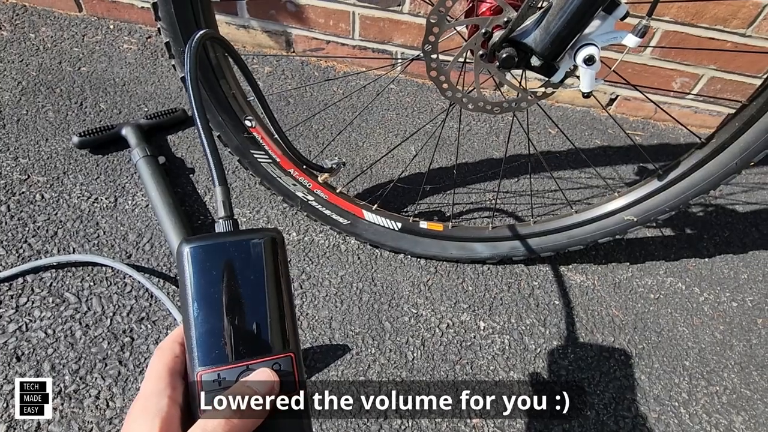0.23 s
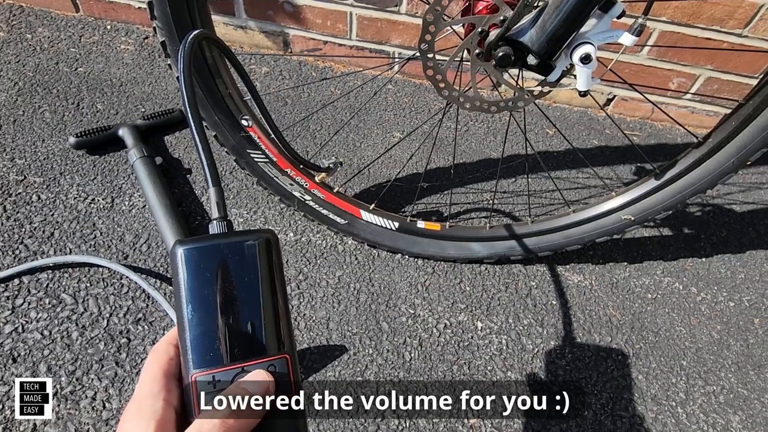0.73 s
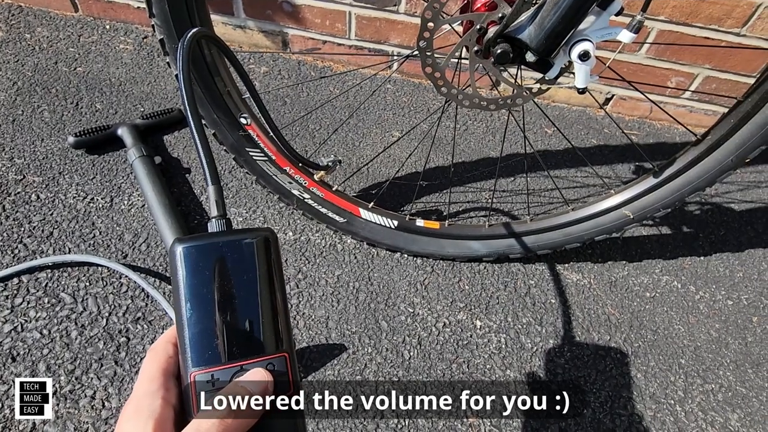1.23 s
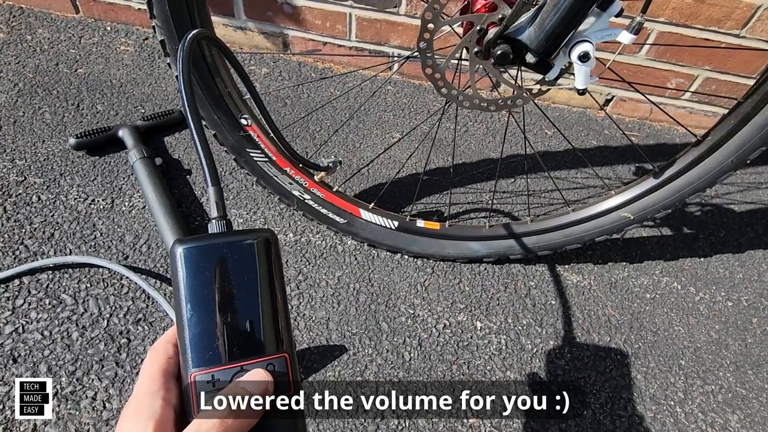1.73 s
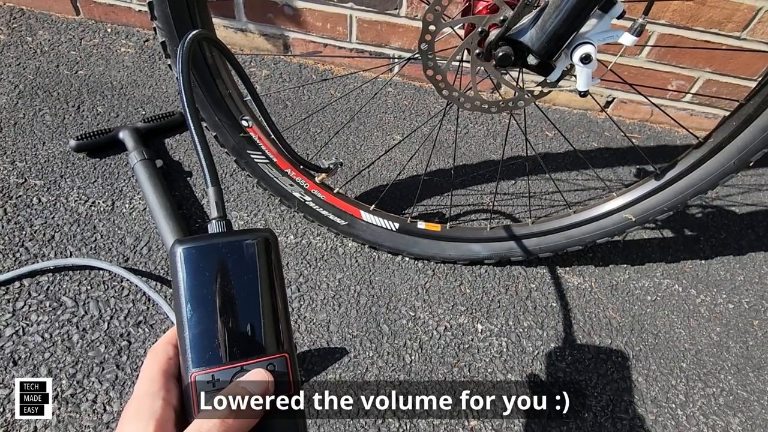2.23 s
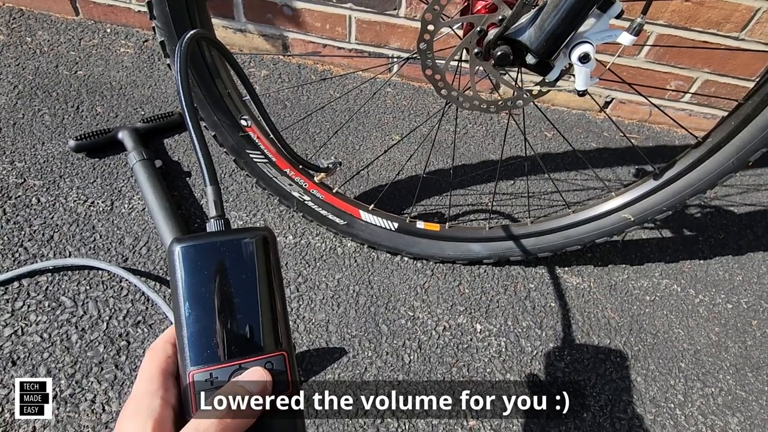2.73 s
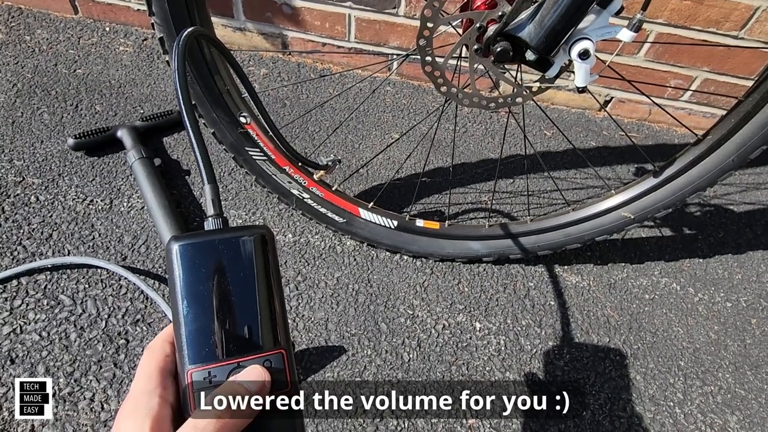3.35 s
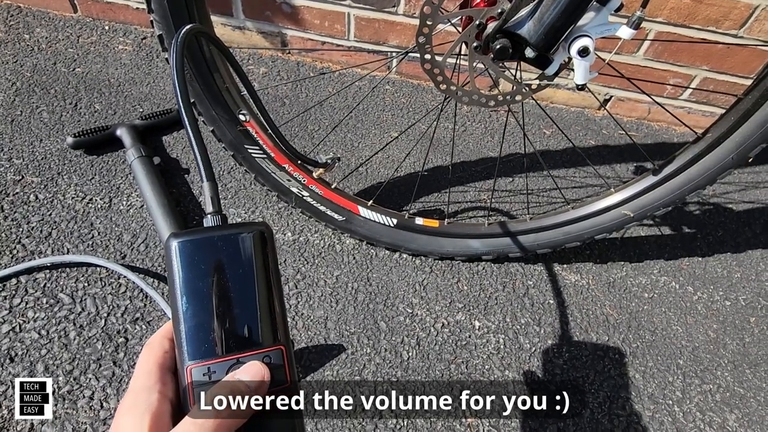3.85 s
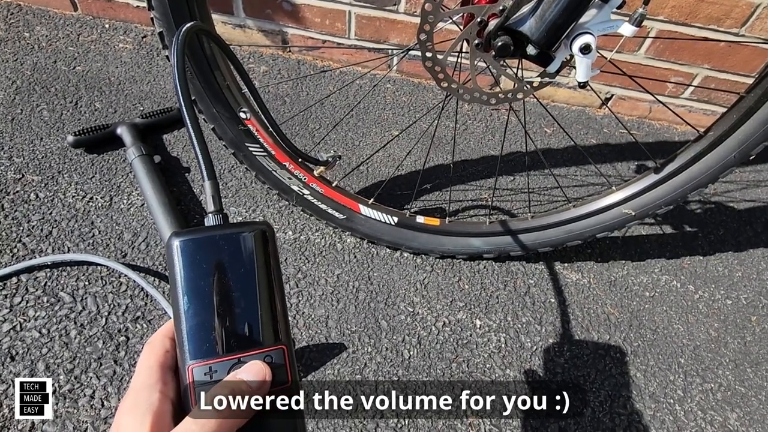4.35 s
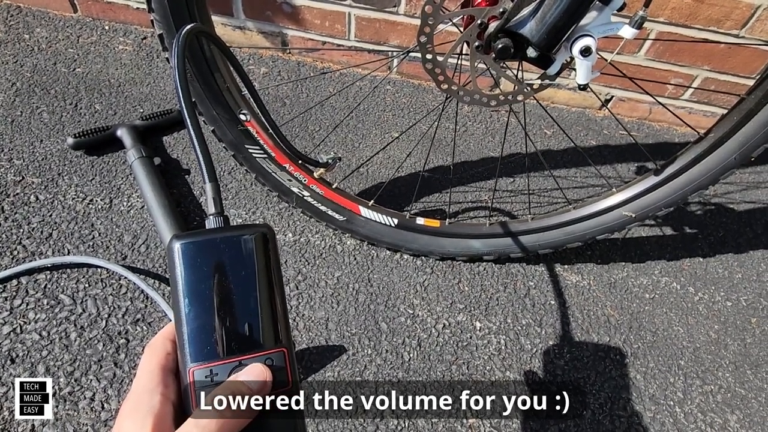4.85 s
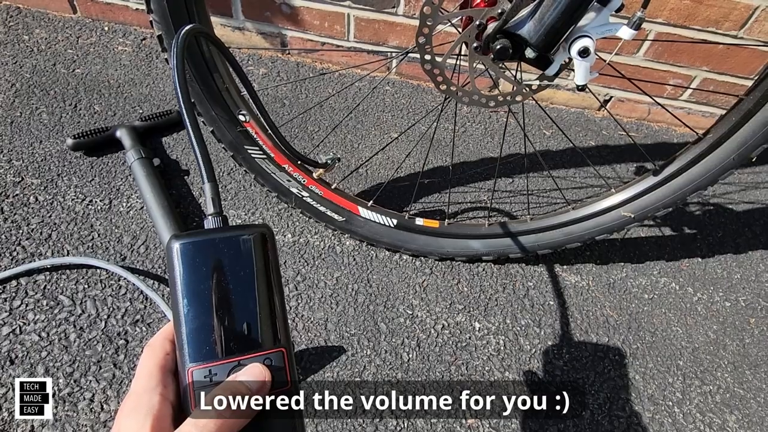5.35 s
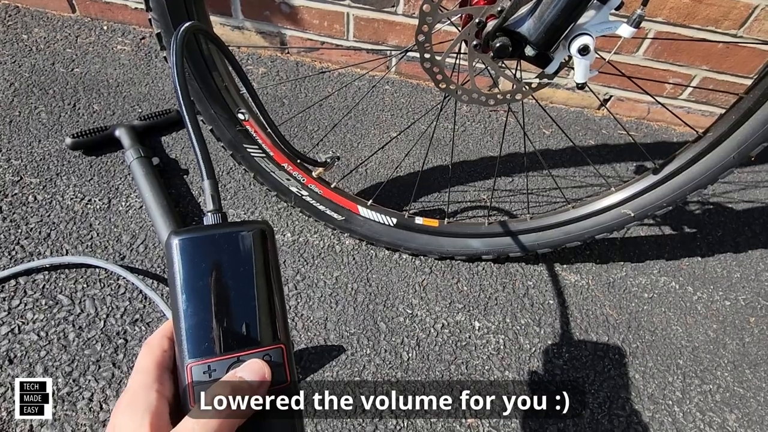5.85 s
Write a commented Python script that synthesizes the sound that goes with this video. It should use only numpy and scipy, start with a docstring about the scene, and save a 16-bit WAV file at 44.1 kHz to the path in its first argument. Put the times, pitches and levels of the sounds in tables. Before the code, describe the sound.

A small hand-held air compressor drones loudly and steadily up close, buzzing, whining and hissing while light wind puffs rumble low.

```python
"""A buzzing piston drone, with a knocking whine, valve clatter and hiss: a hand-held battery compressor
pumps up a bicycle tire outdoors, close to a pair of microphone ports.
Its motor drives a 37-tooth crank gear through an 8-tooth pinion. Drone and upper tones are summed tones
locked to the crank, mostly its harmonics; clatter, grind and hiss are coloured noise shaped by the blows.
The crank slows a little as the tire firms, and a light breeze buffets the ports as gusty low noise."""
import sys
import numpy as np
from scipy.fft import rfft, irfft, next_fast_len
from scipy.io import wavfile
from scipy.ndimage import map_coordinates

SR = 44100
rng = np.random.default_rng(int(sys.argv[2]) if len(sys.argv) > 2 else 0)


def file_out(sig):
    """Save sig as 16-bit WAV at sys.argv[1]."""
    # one column per channel
    cols = np.atleast_2d(sig).T
    # limit, then scale
    lim = np.clip(cols, -1, 1)
    pcm = np.round(lim * 32767).astype(np.int16)
    wavfile.write(sys.argv[1], SR, pcm)


N = 268569
TIME = np.arange(N) / SR
PRESSURE = TIME / TIME[-1]  # 0 = soft tire, 1 = firmer tire

GEAR_TEETH, PINION_TEETH = 37, 8
CRANK_HZ, SAG_HZ_PER_S = 59.825, .3205  # crank speed at the start, and how fast it drops
START_TURNS = -0.03018  # crank angle at the start
KNOCK_PLACE = .46  # turns at which the piston reverses with a knock
BLOW_SCATTER_DB = 1.8  # unevenness from blow to blow in clatter and hiss

SWAY_HZ, SWAY_WIDTH_HZ = 140, 102  # the whole case swaying in the hand
RING_HZ, RING_WIDTH_HZ = 578, 110  # a wall of the case, which rings on after each blow

LEFT_LEAD = 0.0003127  # s by which the noise layers reach the left port first
PORTS_ALIKE = .55  # share of rubbing-noise power common to both ports
CALM_DB = -45  # light air between gusts, before the breeze level
TOP_HZ = 15750  # band limit


def amp(db):
    """Decibels to gain."""
    return 10 ** (np.asarray(db) / 20)


def unit(x):
    """x at rms 1."""
    return x / np.sqrt(np.mean(x ** 2) + 1e-20)


def wobble(rate):
    """A smooth random curve, rate knots a second."""
    knots = rng.standard_normal(int(N * rate / SR) + 4)
    return map_coordinates(knots, [TIME * rate])


def filtered(x, response):
    """x times a complex response of frequency."""
    m = next_fast_len(N + SR // 4)
    hz = np.fft.rfftfreq(m, 1 / SR)
    return irfft(rfft(x, m) * response(hz), m)[..., :N]


def along(knots, values, hz):
    """Values joined on a log-frequency axis."""
    return np.interp(np.log(hz + 1), np.log(knots), values)


def pair(three, alike):
    """Two channels that share the first of three signals."""
    alike = np.clip(alike, 0, 1)
    return np.sqrt(alike) * three[0] + np.sqrt(1 - alike) * three[1:]


def radiate(x, spectrum):
    """White excitation takes the colour heard at each port, which shifts with the pressure."""
    knots, left, right, gained = np.transpose(spectrum)

    def colour(hz, share):
        low_edge = 1 + (knots[0] / (hz + 1)) ** 50
        high_edge = 1 + (hz / knots[-1]) ** 50
        band = 1 / np.sqrt(low_edge * high_edge)
        late = np.exp(-2j * np.pi * hz * LEFT_LEAD)
        ports = np.array([amp(along(knots, left, hz)), amp(along(knots, right, hz)) * late])
        return band * ports * amp(share * along(knots, gained, hz))

    # half the pressure change lies on each side of the tabled colour
    soft = filtered(x, lambda hz: colour(hz, -.5))
    firm = filtered(x, lambda hz: colour(hz, .5))
    return np.sqrt(SR / 2) * (soft + (firm - soft) * PRESSURE)


def crank_turns(drift, jitter):
    """The crank angle in turns: it slows steadily as pressure rises; friction makes it uneven."""
    speed = CRANK_HZ - SAG_HZ_PER_S * TIME
    return START_TURNS + np.cumsum(speed) / SR + drift * wobble(8) + jitter * wobble(70)


def surface(turns, size, order):
    """The roughness of a turning part, met again on every turn: only bumps finer than order."""
    bins = np.arange(size // 2 + 1)
    bumps = np.exp(2j * np.pi * rng.random((3, size // 2 + 1))) * (bins > order)
    place = turns % 1 * size
    profiles = irfft(bumps, size)
    return unit(np.array([map_coordinates(p, [place], order=5, mode="grid-wrap") for p in profiles]))


def rubbing(turns, crank_db, motor_db):
    """Fresh turbulence plus roughness that repeats with the crank and the faster motor shaft."""
    crank = surface(turns, size=744, order=39)
    motor = surface(turns * GEAR_TEETH / PINION_TEETH, size=160, order=3)
    turbulence = rng.standard_normal((3, N))
    return unit(pair(turbulence + amp(crank_db) * crank + amp(motor_db) * motor, PORTS_ALIKE))


# Blows within one crank turn; length is from the peak to 1/e of the power, levels are relative:
# (place [turns], length [turns], push on the case [signed, relative],
#  clatter level [dB], gear load level [dB], hiss level [dB])
BLOWS = [(0.091, 0.0277, -1.475, 2.5, -2, -5), (0.222, 0.0315, 2.27, -8, -5, -7),
         (.33, 0.061, -0.45, -2.5, -5, -4), (0.448, 0.0228, -1.45, 3.5, -3, 0.5),
         (.52, 0.058, 0.44, -3, 1.5, -3), (0.628, .028, 0.525, 4.5, -7, -14),
         (.72, 0.038, -0.23, -5.5, -3.5, -1.5), (.9, 0.079, 1.24, -14, -5, -11)]


def stroke_envelope(turns, levels_db, between_db, scatter_db):
    """The blows of each turn, each at a slightly new strength, over steady rubbing."""
    power = amp(between_db) ** 2
    for (place, length, *_), db in zip(BLOWS, levels_db):
        since = turns - place + 1.5  # a half-turn offset centres the blow in its turn
        turn = since.astype(int)
        strength = amp(db + scatter_db * rng.standard_normal(SR // 100))[turn]
        power = power + strength ** 2 * np.exp(-((since % 1 - .5) / length) ** 2)
    return unit(np.sqrt(power))


# Piston harmonics, rms level averaged over the two ports, before flutter:
# (crank order [per turn], soft-tire level [dB], firmer-tire level [dB],
#  left-right balance [dB], left lead [rad])
PISTON_TONES = [(1, -43.9, -42.8, 1.2, 0), (2, -38.1, -40.8, 0.6, 0.1), (3, -37.4, -38.6, 2.1, 0.1),
                (4, -34.0, -37.0, 2.8, 0.1), (5, -41.9, -41.7, 0.6, 0.2), (6, -40.7, -40.1, 0.9, 0.5),
                (7, -46.0, -47.2, 2.3, 0.5), (8, -37.0, -42.8, 1.9, 0.7), (9, -49.9, -55.9, -2.6, 0.8),
                (10, -48.9, -42.2, -0.5, 0.9), (11, -43.2, -42.4, -4.3, 1.0), (12, -44.1, -60.4, -5.1, 2.3),
                (13, -35.8, -54.5, -3.1, 2.3), (14, -40.7, -48.2, 5.3, 2.9), (15, -50.1, -45.1, 9.5, 1.6),
                (16, -45.3, -43.6, 2.0, 1.4), (17, -53.7, -40.8, -1.9, 1.3), (18, -56.5, -44.7, -9.4, 1.1),
                (19, -53.0, -46.8, -2.8, 3.2)]


def drone(turns, flutter_db, level_db):
    """The piston pushes and pulls the case; the blows of the stroke set its harmonics' timing."""
    place, length, push = np.transpose(BLOWS)[:3]
    out = np.zeros((2, N))
    for k, soft_db, firm_db, pan_db, lead in PISTON_TONES:
        hz = k * CRANK_HZ
        blow = np.sum(push * np.exp(-2j * np.pi * k * place - (np.pi * k * length) ** 2))
        sway = blow / (SWAY_HZ ** 2 - hz ** 2 + 1j * hz * SWAY_WIDTH_HZ)
        # sway and ring set only the phase; the table sets the level
        ring_delay = 2 * np.angle(RING_HZ ** 2 - hz ** 2 + 1j * hz * RING_WIDTH_HZ)
        angle = 2 * np.pi * k * turns + np.angle(sway) - ring_delay
        db = soft_db + (firm_db - soft_db) * PRESSURE + flutter_db * wobble(14)
        pan = unit(amp([[pan_db / 2], [-pan_db / 2]]))
        out += amp(db) * pan * np.cos([angle, angle - lead])
    return np.sqrt(2) * amp(level_db) * out


# Upper pump tones: harmonics of the piston knock, then gear and motor whine;
# rms level averaged over the ports, before flutter, throb and the layer level:
# (crank order [per turn], soft-tire level [dB], firmer-tire level [dB],
#  left-right balance [dB], left lead [rad])
UPPER_TONES = [(22, -54.8, -47.3, 3.5, -2.5), (23, -44.2, -39.9, 8.7, -2.3), (24, -49.3, -46.8, 9.8, 0.7),
               (25, -44.0, -56.1, 6.8, 2.3), (26, -49.9, -47.7, 3.6, -2.8), (27, -46.1, -43.3, 4.0, -2.1),
               (28, -52.9, -47.8, 9.8, -2.6), (29, -51.1, -48.1, 4.5, -2.9), (30, -48.1, -52.2, 2.4, -1.7),
               (31, -41.5, -50.6, 7.6, 2.1), (32, -43.0, -43.8, 10.4, 3.1), (33, -47.3, -37.7, 10.4, 3.0),
               (34, -58.0, -52.0, 6.4, -2.3), (36, -52.6, -46.5, 7.2, -2.9), (37, -44.9, -39.5, 5.6, -2.3),
               (38, -40.1, -45.4, 3.5, 3.0), (39, -45.4, -47.1, 0.2, -3.1), (55.5, -44.6, -51.7, 2.4, -0.4),
               (56, -50.2, -47.9, 11.5, 0.7), (58, -46.3, -48.8, 9.2, 0.3), (67, -53.1, -41.6, 10.1, 0.3),
               (71, -45.8, -48.6, -2.4, -2.1), (72, -44.9, -43.8, 1.4, -0.4), (73, -35.4, -38.0, -4.9, 1.6),
               (74, -40.4, -47.0, -0.9, 2.4), (75, -43.2, -40.5, -4.6, -3.0),
               (77, -48.1, -43.8, -10.7, -0.6), (111, -48.9, -44.0, 4.1, -0.4),
               (113, -43.3, -45.5, -1.5, -0.2), (141, -42.5, -42.5, 4.4, 1.5),
               (143, -49.0, -41.5, 3.9, 0.8), (145, -52.9, -42.2, 3.4, -0.3), (146, -44.6, -35.6, 7.6, 0.2),
               (148, -59.8, -38.8, 8.2, 0.5)]


def knock_and_whine(turns, flutter_db, smear_hz, backlash, throb, level_db):
    """Harmonics of the piston knock, then gear and motor whine that throbs with the changing load."""
    load = stroke_envelope(turns, [row[4] for row in BLOWS], between_db=-7.5, scatter_db=0.4)
    out = np.zeros((2, N))
    for order, soft_db, firm_db, pan_db, lead in UPPER_TONES:
        # low tones line up on the knock; high ones spread over the turn, roughened by play in the teeth
        spread = min(1, (order * CRANK_HZ / smear_hz) ** 2)
        cycles = order * (turns - KNOCK_PLACE) + spread * rng.uniform(-0.5, 0.49)
        angle = 2 * np.pi * cycles + spread * backlash * wobble(90)
        db = soft_db + (firm_db - soft_db) * PRESSURE + flutter_db * wobble(25)
        pan = unit(amp([[pan_db / 2], [-pan_db / 2]]))
        gain = amp(db) * unit(load ** (throb * spread)) * pan
        out -= gain * np.cos([angle, angle - lead])
    return np.sqrt(2) * amp(level_db) * out


# Colour of the plastic case shaken by the piston, port levels at mid-pressure:
# (frequency [Hz], left level [dB per Hz], right level [dB per Hz], gain as the tire firms [dB])
CASE_COLOUR = [(240, -66.5, -68.5, 0.5), (555, -74, -67.5, -4), (756, -68, -63, -0.5),
               (950, -62.5, -65.5, -4), (1085, -69.5, -70, 0.5), (1400, -63, -66, 1),
               (1510, -66, -65.5, -3), (1595, -64.5, -66.5, -5), (1844, -61, -73, 0), (2100, -69, -68, 5),
               (2200, -69, -68, -4), (2310, -67, -70.5, -2), (2520, -85.5, -88, 10),
               (2657, -68.5, -61.5, -4.5)]


def clatter(turns, level_db):
    """Piston and valves knock the case with the blows of every turn."""
    blows = stroke_envelope(turns, [row[3] for row in BLOWS], between_db=-3, scatter_db=BLOW_SCATTER_DB)
    knocks = blows * rubbing(turns, crank_db=-6.5, motor_db=-6.5)
    return amp(level_db) * radiate(knocks, CASE_COLOUR)


# Colour of sliding gear teeth, port levels at mid-pressure, before the grind level:
# (frequency [Hz], left level [dB per Hz], right level [dB per Hz], gain as the tire firms [dB])
TEETH_COLOUR = [(2790, -67.5, -74.5, 6), (3030, -63, -71.5, 0), (3400, -69.5, -65, -3),
                (3850, -60, -78, 1.5), (4060, -66, -60, 0.5), (4370, -65, -66, 5), (4600, -75, -59.5, 0),
                (5170, -67, -73.5, 0), (5900, -70.5, -79, 0.5), (6630, -63, -65, -1.5),
                (7250, -72.5, -68.5, -1), (7600, -65, -65.5, -4), (8320, -63.5, -80, 5)]


def grind(turns, level_db):
    """The teeth slide hardest where the crank is loaded."""
    load = stroke_envelope(turns, [row[4] for row in BLOWS], between_db=-4.0, scatter_db=1.3)
    sliding = load * rubbing(turns, crank_db=-3.5, motor_db=-8)
    return amp(level_db) * radiate(sliding, TEETH_COLOUR)


# Colour of air through the valves, port levels at mid-pressure:
# (frequency [Hz], left level [dB per Hz], right level [dB per Hz], gain as the tire firms [dB])
VALVE_COLOUR = [(8000, -65.5, -74, -4), (8700, -63, -66, 2), (8910, -66.5, -73, 3), (9340, -76, -81, -5),
                (9940, -79.5, -77, -4), (10630, -64, -79, 5.5), (11160, -65.5, -76, -5),
                (11200, -75.5, -67, -5), (12600, -79, -76.5, 1), (12960, -69, -69.0, 2.5),
                (13300, -74, -73, -7), (14300, -71.5, -74, 2.0), (15000, -69.5, -74, -2),
                (15700, -76.0, -75.0, 1)]


def hiss(turns, level_db):
    """Air spurts through the valves as bright turbulence, strongest near mid-turn."""
    spurts = stroke_envelope(turns, [row[5] for row in BLOWS], between_db=-3.5, scatter_db=BLOW_SCATTER_DB)
    air = spurts * rubbing(turns, crank_db=-10.5, motor_db=-12)
    return amp(level_db) * radiate(air, VALVE_COLOUR)


# Colour of wind on the ports, only the shape counts: (frequency [Hz], relative level [dB per Hz])
WIND_COLOUR = [(12, -30), (22, -15), (35, -6), (55, -1.5), (100, -2), (150, -6.5), (220, -13), (330, -25),
               (700, -38)]
# Gusts on the ports, length between the 1/e points of power, level before the breeze level:
# (peak time [s], length [s], peak level [dB])
WIND_GUSTS = [(2.34, 0.28, -35), (2.83, 0.064, -28), (2.95, 1.0, -40.5), (3.93, .22, -37.5),
              (5.36, .08, -31), (5.58, 0.25, -30), (5.718, 0.046, -24.5), (5.962, .14, -32.5)]


def breeze(lumps_db, level_db):
    """Eddies rumble on the ports; each gust swells and fades over the light air."""
    power = amp(CALM_DB) ** 2
    for peak, length, db in WIND_GUSTS:
        power = power + amp(db) ** 2 * np.exp(-(2 * (TIME - peak) / length) ** 2)
    eddies = pair(rng.standard_normal((3, N)), alike=0.56)
    rumble = filtered(eddies, lambda hz: amp(along(*np.transpose(WIND_COLOUR), hz)))
    return amp(level_db) * np.sqrt(power) * unit(rumble * amp(lumps_db * wobble(11)))


def scene():
    """One crank drives every sound of the pump; the breeze blows on its own."""
    turns = crank_turns(drift=0.0013, jitter=0.00042)  # both in turns
    tones = drone(turns, flutter_db=.5, level_db=0)
    # backlash in rad; throb is the exponent on the load
    tones += knock_and_whine(turns, flutter_db=1.3, smear_hz=3320, backlash=0.27, throb=0.69, level_db=-0.44)
    rasp = clatter(turns, level_db=0) + grind(turns, level_db=-1) + hiss(turns, level_db=0)
    return tones + rasp + breeze(lumps_db=1, level_db=1.3)


def record(dry):
    """A steep low-pass keeps nothing above the band limit."""
    return filtered(dry, lambda hz: hz < TOP_HZ)


dry = scene()
out = record(dry)
file_out(out)
```